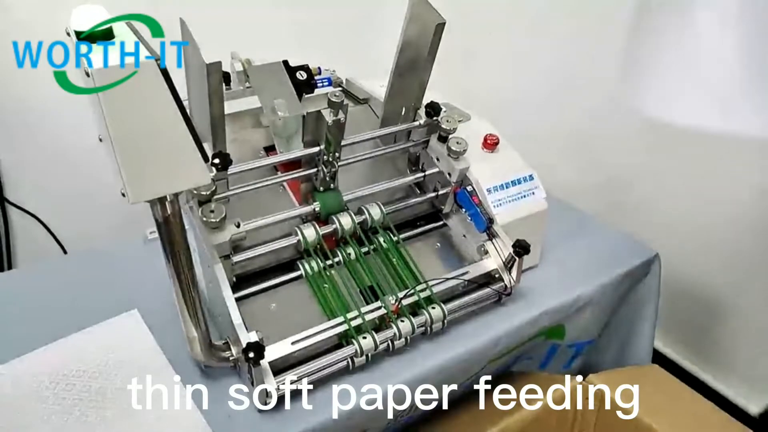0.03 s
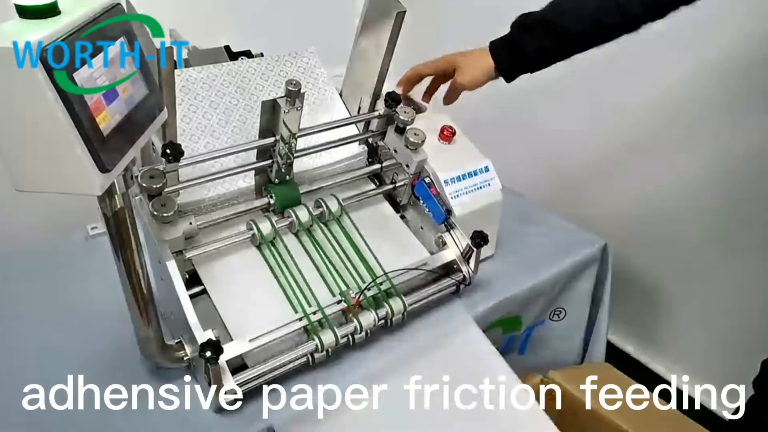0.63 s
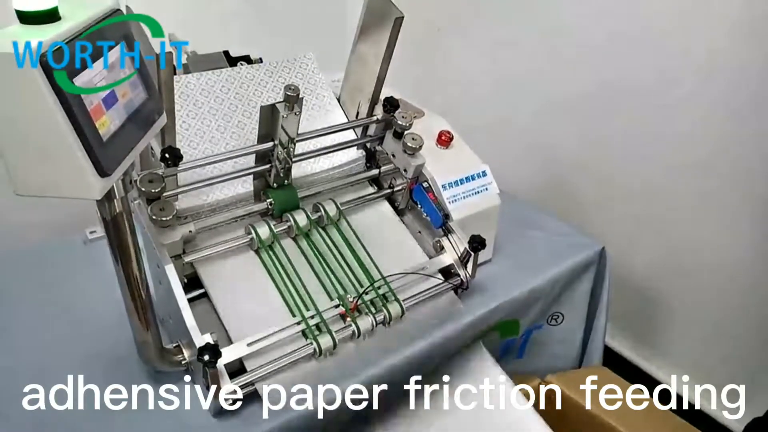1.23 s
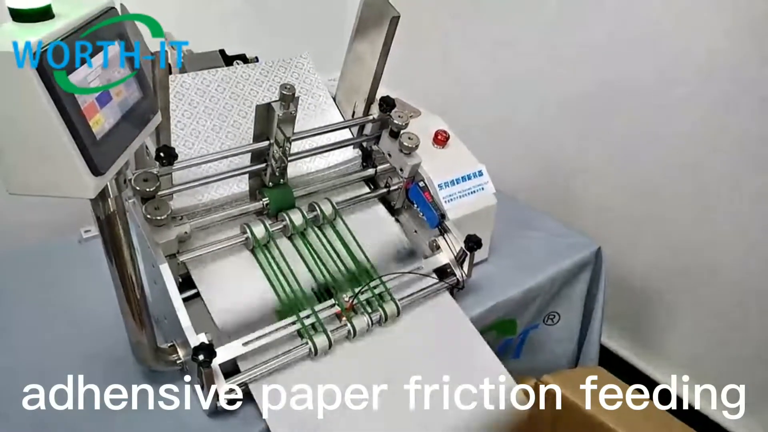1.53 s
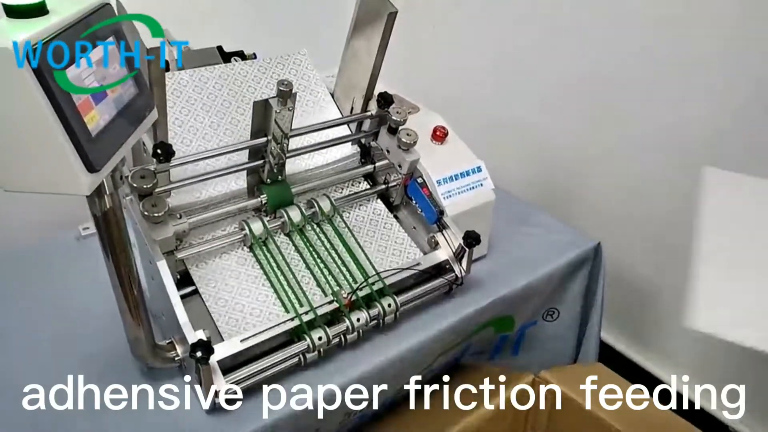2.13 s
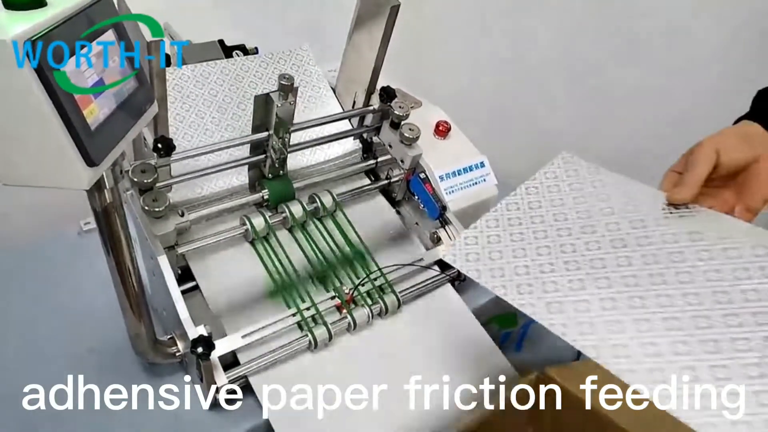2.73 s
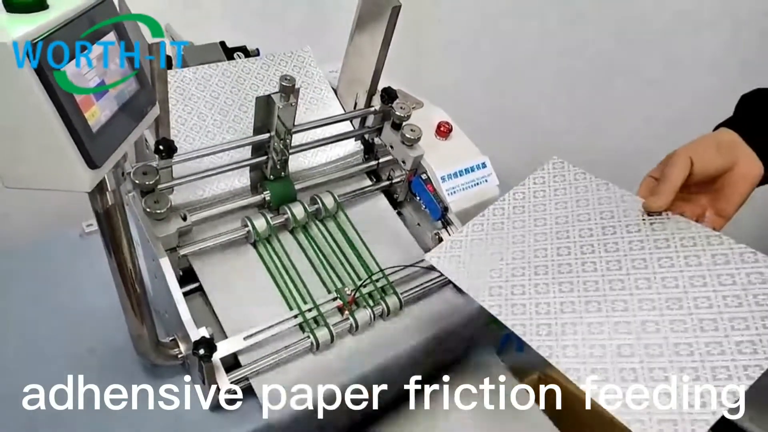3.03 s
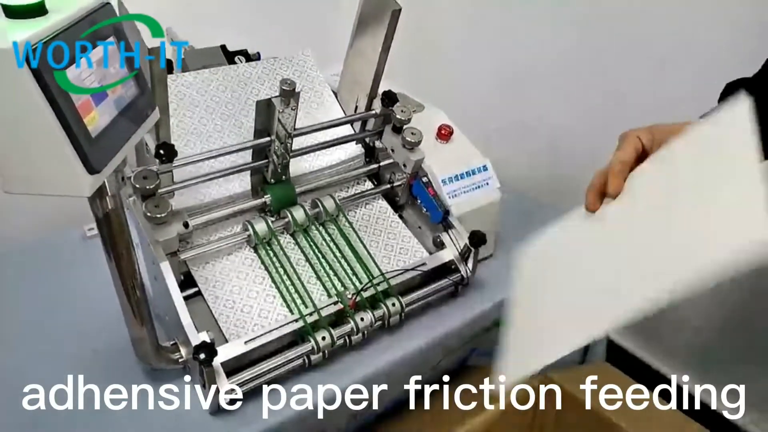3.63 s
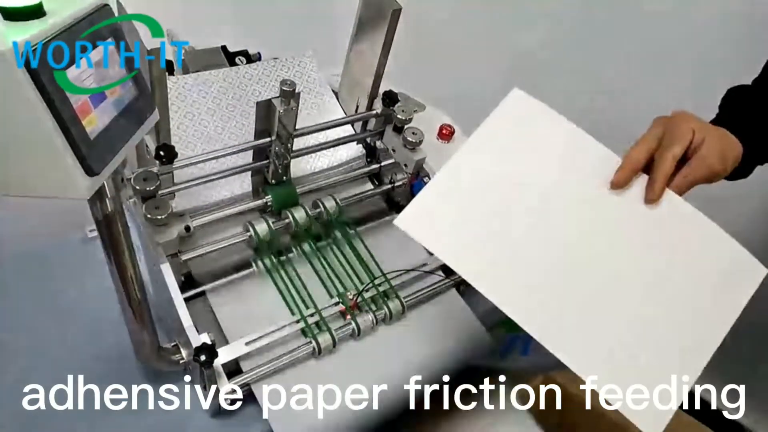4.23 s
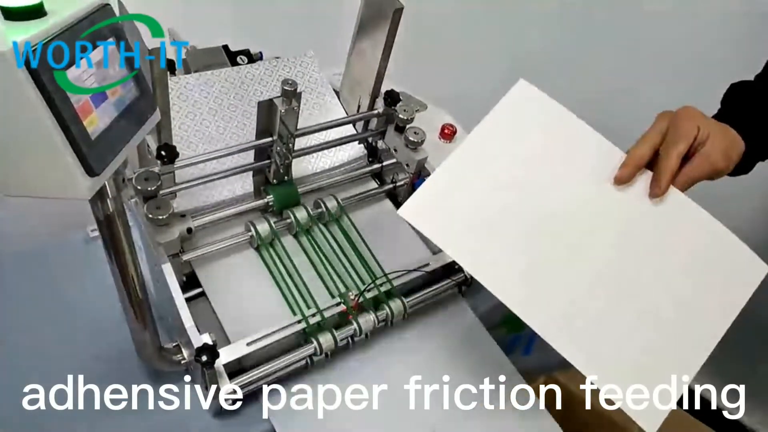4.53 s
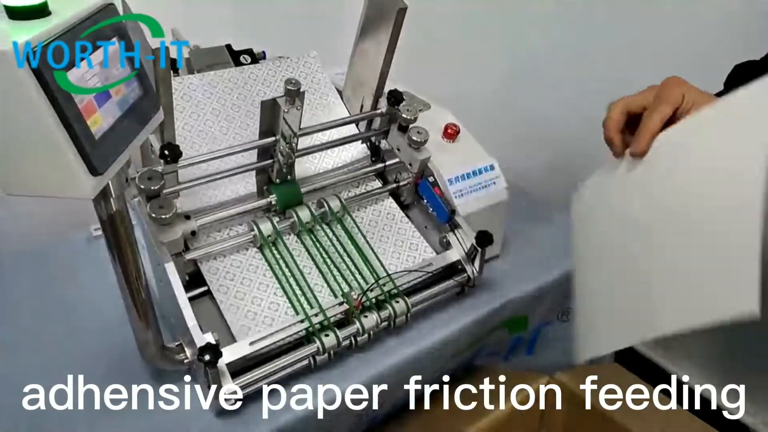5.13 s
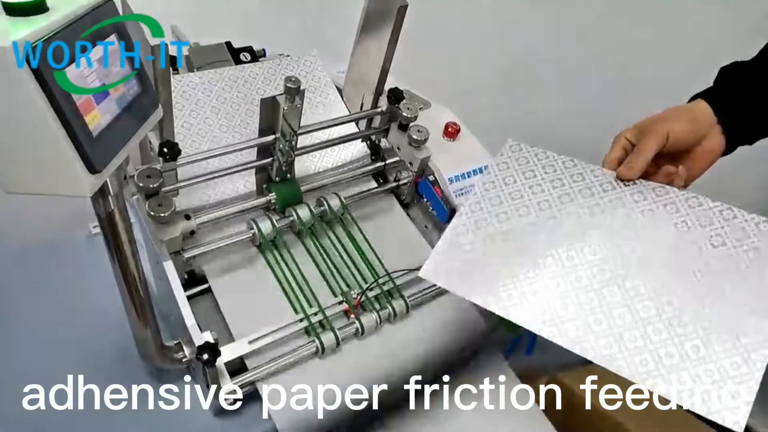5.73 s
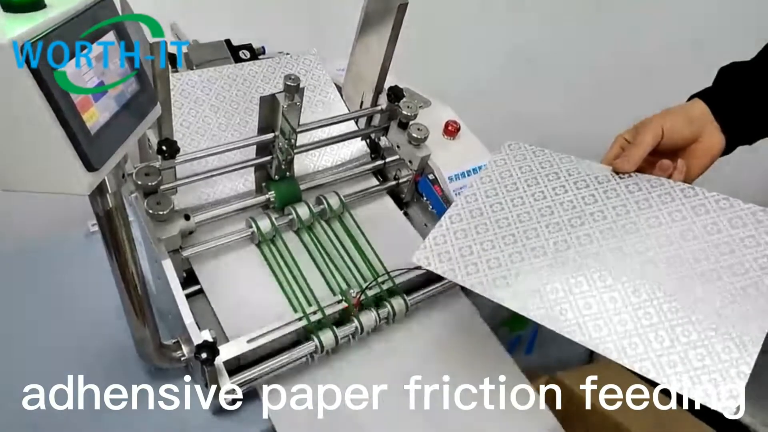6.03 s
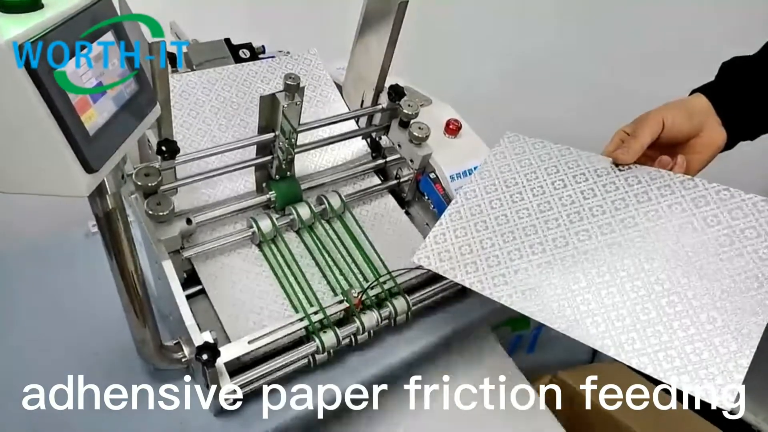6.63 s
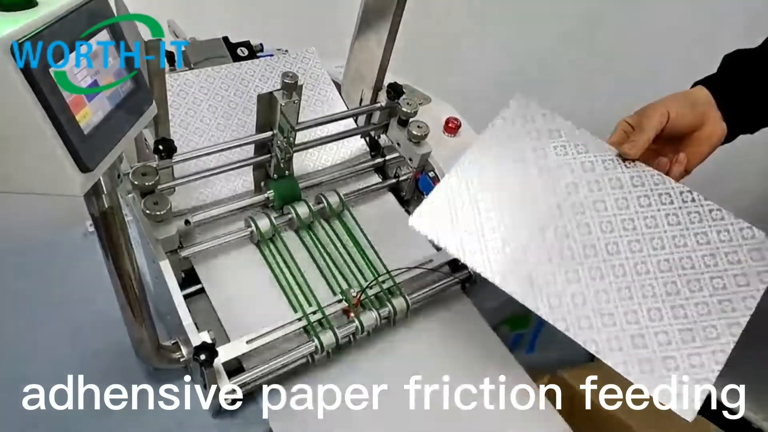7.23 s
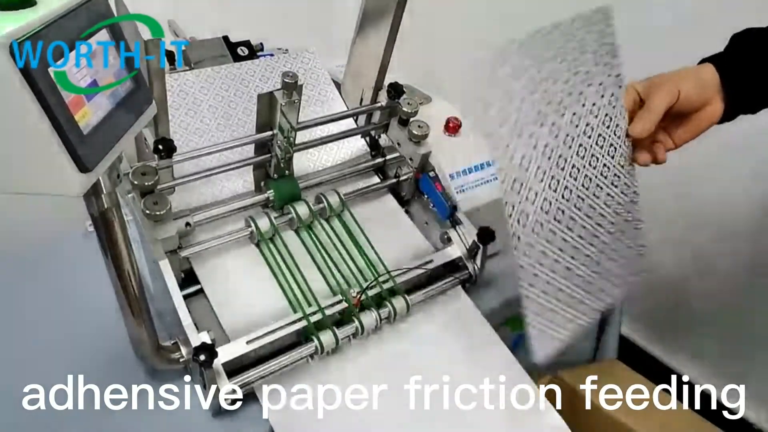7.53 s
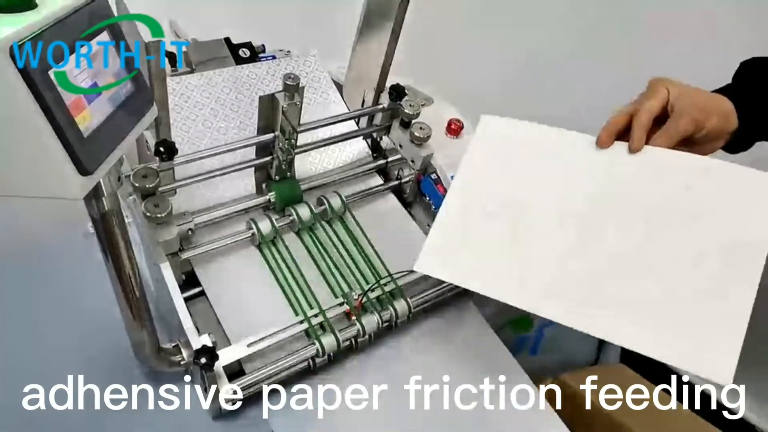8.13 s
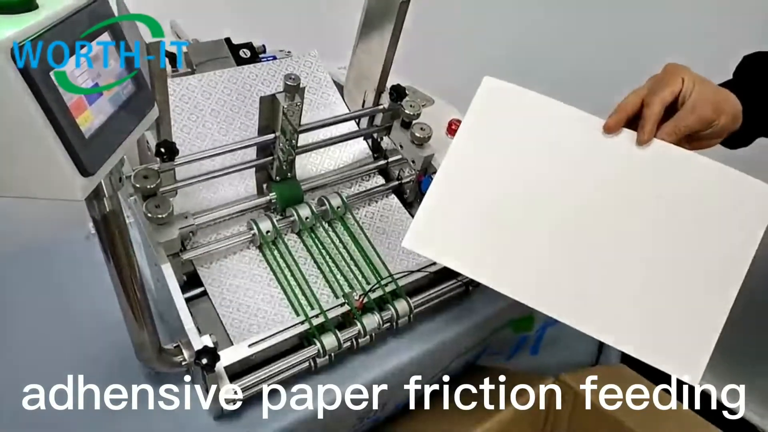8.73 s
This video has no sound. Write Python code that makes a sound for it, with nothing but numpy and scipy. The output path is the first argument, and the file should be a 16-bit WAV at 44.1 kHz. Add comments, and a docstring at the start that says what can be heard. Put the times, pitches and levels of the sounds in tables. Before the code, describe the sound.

Paper rustles faintly and the sound cuts out for an instant. Then a tabletop sheet feeder runs five times, about a second each, with half-second pauses. In every run the motor whirs with a thin whine, paper hisses over rubber belts, and the rollers rattle quickly, setting steel rods ringing. A clunk follows each stop. The machine sounds close, in a small, hard-walled workshop with a short reverberation.

```python
"""A tabletop friction feeder pushes five sheets through in a small hard-walled workshop.
First paper rustles and the sound drops out for a moment. Then the motor runs five times, once a sheet:
it starts with a jolt, sliding friction makes the paper hiss, and the drive whirs in the steel frame.
The rollers rattle once a turn, about nine times a second; hard impacts set rods and panels ringing.
A clunk follows the stop, and the reverberation dies away."""
import sys
import numpy as np
from scipy import signal
from scipy.fft import rfft, irfft, next_fast_len
from scipy.io import wavfile
from scipy.ndimage import map_coordinates

SR = 44100
rng = np.random.default_rng(int(sys.argv[2]) if len(sys.argv) > 2 else 0)


def waveform_to_disk(signal):
    """Save audio, clipped to [-1, 1], as 16-bit WAV at the path in sys.argv[1]."""
    frames = np.transpose(np.atleast_2d(signal))
    scaled = np.clip(frames, -1, 1) * 32767
    samples = np.round(scaled).astype(np.int16)
    wavfile.write(sys.argv[1], SR, samples)


N = 392049
TIME = np.arange(N) / SR


def amp(db):
    """Amplitude ratio of a level in decibels."""
    return 10 ** (np.asarray(db) / 20)


def unit(x):
    """Normalisation to rms 1."""
    return x / np.sqrt(np.mean(x ** 2) + 1e-20)


def along(points, hz):
    """Interpolation of (f/Hz, value) points on a logarithmic frequency axis."""
    f, v = np.transpose(points)
    return np.interp(np.log(hz + 1), np.log(f), v)


def wobble(rate):
    """Smooth random modulation through rate knots a second."""
    return map_coordinates(rng.standard_normal(int(N * rate / SR) + 4), [TIME * rate])


def pulse(s, half_s):
    """Gaussian envelope centred on time s."""
    return np.exp(-((TIME - s) / half_s) ** 2)


def decay(s, rise_s, t60):
    """Exponential decay from time s, with a linear onset."""
    return np.clip((TIME - s) / rise_s, 0, 1) * amp(-60 * np.abs(TIME - s) / t60)


def filtered(x, response):
    """Linear filtering: the spectrum of x times a frequency response."""
    n = x.shape[-1]
    m = next_fast_len(n + 8192)
    return irfft(rfft(x, m) * response(np.fft.rfftfreq(m, 1 / SR)), m)[..., :n]


def colour(x, spectrum):
    """Spectral shaping of x, at rms 1."""
    return unit(filtered(x, lambda hz: amp(along(spectrum, hz))))


def grains(rate):
    """Shot noise: tiny contacts of random size at random times, rate a second."""
    sizes = rng.standard_normal(N) * amp(2 * rng.standard_normal(N))
    return unit(sizes * (rng.random(N) < rate / SR))


def wavering(hz, width):
    """Narrow-band noise: a tone about width Hz wide whose amplitude and phase drift."""
    phase = 2 * np.pi * np.cumsum(hz * np.ones(N)) / SR
    return unit(wobble(width) * np.cos(phase) + wobble(width) * np.sin(phase))


# spectrum of the room's air: f/Hz, relative density/dB
AIR_SPECTRUM = [(20, -6), (45, -5), (80, -16.5), (150, -19), (270, -7.5), (700, -2), (1350, -16),
                (2950, -15), (3900, -27.5), (6800, -19.5), (7900, -27), (9000, -47.5)]
def background(whistle_hz=8005):
    """Noise floor: broadband air and a faint narrow-band whistle from the motor electronics."""
    air = amp(-61 + 0.96 * wobble(2.36)) * colour(rng.standard_normal(N), AIR_SPECTRUM)
    return air + amp(-83) * wavering(whistle_hz, width=27)


# reverberation time: f/Hz, T60/s
REVERB_TIMES = [(100, 1), (300, 0.88), (900, 0.79), (2500, 0.62), (7000, 0.69), (11000, 0.14)]
# the walls return less of the low notes: f/Hz, gain/dB
WALL_GAIN = [(150, -1), (270, -3), (380, -2.5), (550, 0)]
def workshop(x, delay_s=0.009, segments=24):
    """Diffuse reverberation: the walls answer after a delay, in a pattern that shifts as things move."""
    out = np.zeros(N + 2 * SR)
    for part in np.array_split(np.arange(N), segments):
        hz, t, noise = signal.stft(rng.standard_normal(SR), SR, nperseg=256)
        absorption = amp(-60 * t / along(REVERB_TIMES, hz)[:, None])
        tail = signal.istft(noise * absorption, SR, nperseg=256)[1]
        echo = signal.fftconvolve(x[part], tail / np.linalg.norm(tail))
        out[part[0] + round(delay_s * SR):][:len(echo)] += echo
    return filtered(out[:N], lambda hz: amp(along(WALL_GAIN, hz)))


# dull bumps: t/s, level/dB, T60/s
LOW_BUMPS = [(.56, -56, 0.13), (4.247, -44.5, 0.4), (6.9, -48, 0.55), (7.513, -45, 0.68)]
# their spectrum: f/Hz, relative density/dB
BUMP_SPECTRUM = [(20, -6), (45, -35), (80, 30), (125, -11), (200, -34), (400, -62)]
def bumps(rise_s=0.015):
    """Exponentially decaying low noise: an occasional dull bump under the clatter."""
    envelope = sum(amp(db) * decay(s, rise_s, t60) for s, db, t60 in LOW_BUMPS)
    return envelope * colour(rng.standard_normal(N), BUMP_SPECTRUM)


# paper handled while the motor rests: t/s, peak level/dB, half length/s
PAPER_RUSTLES = [(0.067, -57, 0.17), (0.153, -51, 0.021), (0.2, -66, 0.029), (3.707, -56, 0.1),
                 (7.042, -57, 0.03)]
# spectra of rubbing paper and of a swung sheet: f/Hz, relative density/dB
PAPER_SPECTRUM = [(300, -34), (900, -10.5), (1800, -9.5), (2500, 0), (3300, 0.5), (3800, -6.5), (4500, -6),
                  (5200, 0), (6100, 1), (7300, 3), (8000, -5.5), (9000, -14.5), (10200, -20),
                  (11000, -71.5)]
FLUTTER_SPECTRUM = [(12, -45), (20, 2), (90, -16.5), (168, -2.5), (219, -11), (310, -6), (390, -17),
                    (556, -10), (650, -24), (1030, -18.5), (4000, -54), (5200, -41), (8800, -120)]
def handling():
    """Flutter and friction: a sheet swung through the air flaps low, and loose paper rustles."""
    swish = sum(amp(db) * pulse(s, half_s) for s, db, half_s in PAPER_RUSTLES)
    rustle = swish * colour(grains(rate=5300), PAPER_SPECTRUM)
    swing = amp(-47.5) * np.interp(TIME, [0, .13, .24, .6, .68], [0.93, 0.74, 0.36, 0.31, 0])
    return rustle + swing * colour(rng.standard_normal(N), FLUTTER_SPECTRUM)


# hollow notes after some knocks: t/s, f/Hz, level/dB, T60/s, bandwidth/Hz
HOLLOW_MODES = [(0.95, 710, -38.5, 0.9, 70), (0.95, 329, -35.5, 0.49, 58), (1.19, 622, -44, 1.2, 79),
                (1.52, 268.6, -44, 0.9, 23), (1.99, 267.4, -47, 0.61, 24), (2.835, 596, -36, 0.25, 130),
                (4.247, 590, -50, 1, 78), (4.603, 611, -39.5, 0.33, 63), (5.68, 385, -44, 1, 92),
                (6.016, 614, -42.5, 0.71, 45), (7.514, 594, -45, 1.9, 40), (8.085, 247.7, -39.5, 0.8, 19.8),
                (8.2, 238, -39, 0.51, 19.3)]
def hollows(rise_s=0.0045):
    """Damped free vibration: a stretched sheet or a panel hums on."""
    return sum(amp(db) * decay(s, rise_s, t60) * wavering(hz, width)
               for s, hz, db, t60, width in HOLLOW_MODES)


# the many close modes of the steel rods and guides: f/Hz, relative density/dB
ROD_SPECTRUM = [(180, -37), (260, -12), (430, -0.5), (570, 1.5), (1050, 4.5), (1300, -9.5), (1650, -6.5),
                (2070, -2.5), (2650, -13), (3050, -11.5), (3800, -65)]
def rods(ring_db=-39, hard_db=-30, steepness=2.73, t60=1.56, spread_s=0.056):
    """High modal density: steelwork rings as a wash of noise after hard blows, hardly after soft ones."""
    power = np.zeros(N)
    for s, _, frame_db, *_ in KNOCKS:
        start = round(s * SR)
        t = TIME[:N - start]
        level_db = ring_db + steepness * (frame_db - hard_db) - 60 * t / t60
        power[start:] += (1 - np.exp(-t / spread_s)) * amp(level_db) ** 2
    return np.sqrt(power) * colour(rng.standard_normal(N), ROD_SPECTRUM)


def squeak(s=0.669, hz=2770, db=-43.5, half_s=0.018):
    """Stick-slip friction: a rubber belt slips for an instant as it grips the first sheet."""
    return amp(db) * pulse(s, half_s) * wavering(hz, width=150)


# a sheet's edge snaps free: t/s, peak level/dB
EDGE_SNAPS = [(0.598, -45.5), (1.041, -35.5), (4.024, -55), (5.29, -41.5), (6.465, -49), (7.294, -48),
              (8.54, -42.5)]
# spectrum of a snap: f/Hz, relative density/dB
SNAP_SPECTRUM = [(800, -19), (2700, 1), (4200, -16), (6000, 11), (7400, 10.5), (8600, 0), (10000, -36)]
def snaps(t60=0.074):
    """Sudden release: an edge flicks past a guide with a short bright transient."""
    envelope = sum((TIME >= s) * amp(db - 60 * np.abs(TIME - s) / t60) for s, db in EDGE_SNAPS)
    return envelope * colour(rng.standard_normal(N), SNAP_SPECTRUM)


def scraping(edges_hz=(3900, 6500, 8700), depths_db=(2, 2.2, 2.2, 4.5)):
    """Sliding friction of paper on rubber: each band catches and slips on its own, the highest most."""
    rub = colour(grains(rate=11000) + amp(-5.5) * grains(rate=450), PAPER_SPECTRUM)  # grit and crackle
    bands = [filtered(rub, lambda hz: np.digitize(hz, edges_hz) == k) for k in range(len(depths_db))]
    return unit(sum(band * amp(depth * wobble(45)) for band, depth in zip(bands, depths_db)))


# resonances of the frame and its panels: f/Hz, bandwidth/Hz, relative level/dB
FRAME_MODES = [(121, 13, -6.5), (164, 4, -2.5), (226, 16, -0.5), (270, 31.5, 4), (355.5, 7.4, 3),
               (453, 23, -23), (588, 180, -2.5), (733, 50, -9.5), (743, 28, -6), (948, 24, -7),
               (1101, 38, -2.5), (1357, 26, -4), (1520, 23, -10), (1516, 40, -17), (1710, 38, -7),
               (2554, 210, -2.5), (2990, 220, -23)]
def frame_response(spectrum, floor_db, size=8192):
    """Resonance: the frame's modes rise out of a broad spectrum, as a minimum-phase impulse response."""
    hz = np.fft.rfftfreq(size, 1 / SR)
    peaks = sum(amp(db) ** 2 / (1 + (2 * (hz - centre) / width) ** 2)
                for centre, width, db in FRAME_MODES)
    gain = amp(along(spectrum, hz)) * np.sqrt(peaks + amp(floor_db) ** 2)
    cepstrum = irfft(np.log(gain + 1e-6))
    causal_fold = np.r_[1, np.full(size // 2 - 1, 2), np.zeros(size // 2)]
    return irfft(np.exp(rfft(cepstrum * causal_fold)))[:size // 2]


# motor runs, levels relative: start t/s, stop t/s, hiss level/dB, rumble level/dB, jolt level/dB,
# time to grip/s, fall of the hiss over the run/dB, whine level/dB
MOTOR_RUNS = [(0.603, 1.877, -42.5, -41, -79, 0.065, 8, -54),
              (2.368, 3.514, -47, -47.5, -56, 0.051, 5, -56),
              (4.022, 5.168, -49, -46.5, -66, 0.019, 0.5, -53.5),
              (5.673, 6.792, -46.5, -49.5, -48, 0.0066, 2, -50.5),
              (7.295, 8.421, -45.5, -43, -54, 0.041, 0, -53.5)]
# lesser tones of the drive: f/Hz, relative level/dB, bandwidth/Hz
GEAR_TONES = [(243.6, -55, 44), (359, -57.5, 20), (462.4, -59, 30), (594, -59, 55), (1100, -58.5, 130),
              (5970, -58.5, 240)]
# the belts' force on the frame: f/Hz, relative density/dB
BELT_SPECTRUM = [(40, -14), (90, 0.5), (170, -9), (250, -1.5), (400, -3.5), (650, 3), (1100, 0.5),
                 (1450, -5), (2000, -5.5), (3000, -13), (4000, -10), (9000, -87.5)]
def drive(turn_s=0.114, spin_up_s=0.12, stop_s=0.12, overrun_s=0.029, whine_hz=2502, whine_sag=0.012):
    """Friction and forced vibration: paper rubs, belts shake the frame, gears whir, the motor whines."""
    hiss, rumble, gears, whine, drag = np.zeros((5, N))
    for start, stop, hiss_db, rumble_db, _, grip_s, fall_db, whine_db in MOTOR_RUNS:
        braking = np.clip((stop + overrun_s - TIME) / stop_s + .5, 0, 1)
        grip, speed = (np.clip((TIME - start) / rise, 0, 1) * braking for rise in (grip_s, spin_up_s))
        travel = np.clip((TIME - start) / (stop - start), 0, 1)
        hiss += grip * amp(hiss_db - fall_db * travel)
        rumble += grip * amp(rumble_db)
        gears += speed
        whine += speed * amp(whine_db)
        # the rollers press harder on the sheet once a turn
        turns = np.linspace(start, stop, round((stop - start) / turn_s) + 1)[1:]
        drag += sum(pulse(s, half_s=0.029) for s in turns)
    paper = hiss * amp(-1.17 + 2 * drag + 0.97 * wobble(70)) * scraping()
    shake = signal.fftconvolve(grains(rate=1400), frame_response(BELT_SPECTRUM, floor_db=-10))[:N]
    belts = rumble * amp(-6 + 4.5 * drag + 1.94 * wobble(35)) * unit(shake)
    # uneven load makes every tone waver, and pulls the whine down once a turn
    whir = gears * amp(-1) * sum(wavering(hz, width) * amp(db) for hz, db, width in GEAR_TONES)
    whine *= amp(-5 + 3 * wobble(7.8))
    pitch_hz = whine_hz * (1 - whine_sag * drag) + 18 * wobble(29)
    return paper + belts + whir + whine * wavering(pitch_hz, width=115)


def jolts(rise_s=0.0034, notes_hz=(241, 470)):
    """Starting transient: the frame shudders at each motor start; rows as in KNOCKS."""
    return [(start, db, db, db - 6.5, db - 7, rise_s, *notes_hz) for start, _, _, _, db, *_ in MOTOR_RUNS]


# knocks, levels relative: the rollers' knocks, the clunk after each stop and a start jolt at 5.68 s: t/s, thud
# level/dB, frame level/dB, clack level/dB, paper tick level/dB, rise time/s (short: a clean blow, long: a
# rattle), low panel note f/Hz, high panel note f/Hz
KNOCKS = [(0.946, -33.5, -30.5, -35, -43.5, 0.00055, 300, 803),
          (1.095, -43, -44, -46, -51, 0.0049, 270, 620),
          (1.189, -31, -34, -39, -39.5, 0.0015, 345, 538),
          (1.3, -34, -32, -35, -59, 0.00013, 204, 590),
          (1.41, -38, -33, -37.5, -57, 0.000044, 230, 590),
          (1.515, -38.5, -45, -45, -65, 0.0025, 260, 590),
          (1.635, -35, -44, -45, -55, 0.0043, 265, 465),
          (1.742, -41, -43, -43.5, -46, 0.0028, 330, 590),
          (1.867, -36, -44, -43, -48.5, 0.0051, 280, 538),
          (1.985, -31, -32.5, -43, -44.5, 0.0028, 264, 564),
          (2.601, -37.5, -36.5, -44.5, -48, 0.0019, 300, 460),
          (2.718, -37, -41, -47, -49, 0.013, 273, 1080),
          (2.835, -36.5, -38.5, -47, -47, 0.00077, 460, 556),
          (2.9525, -38.5, -32.5, -36.5, -48.5, 0.00016, 370, 562),
          (3.072, -35, -40.5, -50, -52.5, 0.0003, 280, 1100.0),
          (3.178, -44, -45, -44, -52, 0.011, 270, 475),
          (3.278, -37, -41.5, -51, -50, 0.00042, 284, 587),
          (3.402, -39.5, -38, -43, -53, 0.00054, 360, 830),
          (3.522, -36, -40, -45, -51, 0.00035, 270, 528),
          (3.633, -41.5, -47, -43, -46.5, 0.0015, 258, 980),
          (4.245, -42, -35, -43, -49, 0.00072, 400, 580),
          (4.373, -39, -42.5, -45, -56, 0.015, 250, 1100.0),
          (4.493, -41, -42, -45, -46.5, 0.00041, 330, 563),
          (4.603, -35, -37.5, -45.5, -45, 0.00067, 500, 566),
          (4.715, -36.5, -32, -40, -57, 0.00049, 350, 1000),
          (4.829, -38.5, -41.5, -44, -52, 0.003, 240, 575),
          (4.946, -33, -35.5, -45.5, -47, 0.00079, 237, 430),
          (5.057, -36.5, -38.5, -42.5, -51, 0.0026, 260, 467),
          (5.172, -33, -37, -47, -51.5, 0.0018, 280, 450),
          (5.2872, -37, -30, -36.5, -43, 0.00053, 266, 596),
          (5.68, -50.5, -45.5, -52, -64, 0.0012, 340, 537),
          (6.0154, -36.5, -38, -46.5, -45, 0.00017, 410, 560),
          (6.123, -42, -43, -49, -59, 0.0065, 270, 570),
          (6.245, -38, -62, -47, -56, 0.00078, 240, 557),
          (6.344, -43, -47, -49.5, -52, 0.0027, 230, 470.0),
          (6.4658, -46, -52.5, -49, -45.5, 0.00031, 320, 557),
          (6.568, -42, -53, -51, -47.5, 0.0011, 310, 510),
          (6.677, -36, -37.5, -47, -49.5, 0.00051, 280, 775),
          (6.793, -39.5, -40.5, -50.5, -50, 0.0025, 240, 627),
          (6.903, -42, -43, -45, -51.5, 0.0017, 280, 594),
          (7.5135, -42.5, -34.5, -41, -56, 0.00023, 350, 600),
          (7.632, -43.5, -40.5, -45, -61, 0.013, 230.0, 646),
          (7.742, -48, -37.5, -42.5, -45.5, 0.0093, 290, 587),
          (7.854, -38, -40, -41.5, -45.5, 0.0073, 355, 600),
          (7.976, -33, -41, -42.5, -49, 0.002, 186, 538),
          (8.083, -40.5, -38, -43, -47.5, 0.0013, 250, 800),
          (8.195, -36.5, -42, -46, -53, 0.0041, 270, 620),
          (8.312, -37.5, -34.5, -41.5, -48.5, 0.00023, 280, 579),
          (8.426, -36.5, -40, -44, -49, 0.0039, 205, 550),
          (8.542, -33.5, -40, -42, -52.5, 0.00056, 250, 763)]
# spectra of the rattle and of the first hard contact: f/Hz, relative density/dB
RATTLE_SPECTRUM = [(35, -29.5), (80, -6), (130, -3), (260, 3), (600, -1), (1050, -1.5), (1400, -6.5),
                   (1950, -5), (2500, -6), (3100, -3), (3900, -16.5), (5200, -18), (7100, -17),
                   (8300, -25.5), (10000, -57)]
STRIKE_SPECTRUM = [(60, -18), (250, -3.5), (370, -0.5), (480, 6), (660, -2.5), (1100, 4), (1550, 2),
                   (2050, -5.5), (2600, -2), (3100, -3.5), (3700, -26), (5800, -15), (7300, -15),
                   (10000, -47.5)]
def knocks(hold_s=0.011, rattle_t60=0.11, note_t60=0.08, hard_rise_s=0.00034, rebound_s=0.0121):
    """Impact excitation: a blow, a rebound and a rattle of loose parts ring the frame and two notes."""
    lead = 256  # samples before the contact
    t = np.maximum(np.arange(-lead, SR // 4), 0) / SR
    body = frame_response(RATTLE_SPECTRUM, floor_db=-6)
    blow = frame_response(STRIKE_SPECTRUM, floor_db=-3)
    # table boom, thud, frame, clack, paper tick
    bands_hz = [(70, 165), (165, 430), (430, 1250), (1250, 3700), (4500, 10000)]
    below = lambda hz, edge: 1 / (1 + (hz / edge) ** 8)
    rebound = 1 + 0.6 * np.exp(-((t - rebound_s) / 0.001) ** 2)
    out = np.zeros(N + SR)
    for s, thud_db, frame_db, clack_db, tick_db, rise, *notes_hz in list(KNOCKS) + jolts():
        attack = 1 - np.exp(-t / rise)
        fading = lambda t60, hold=0: attack * amp(-60 * np.maximum(t - rise - hold, 0) / t60)
        force = rng.standard_normal(len(t)) * fading(rattle_t60, hold_s) * rebound
        ring = signal.fftconvolve(force, body / np.linalg.norm(body))[:len(t)]
        hardness = 1 / (1 + rise / hard_rise_s)  # a sudden contact puts more into the first blow
        ring[lead:lead + len(blow)] -= 32 * hardness * blow / np.linalg.norm(blow)
        bands = [filtered(ring, lambda hz: below(hz, high) - below(hz, low)) for low, high in bands_hz]
        bands_db = [min(thud_db - 11.5, -47), thud_db - 2, frame_db - 1.95, clack_db - 2.47, tick_db]
        notes = [-fading(note_t60) * np.sin(2 * np.pi * hz * t) for hz in notes_hz]
        notes_db = [thud_db - 6, frame_db - 8]
        for part, db in zip(bands + notes, bands_db + notes_db):
            rms = np.sqrt(np.sum(part ** 2) / (0.04 * SR))  # its energy spread over 40 ms
            out[round(s * SR) - lead:][:len(t)] += amp(db) * part / rms
    return out[:N]


def scene():
    """Superposition of the machine's direct sound, its reverberation and the background."""
    hits = amp(-0.63) * knocks() + snaps()
    motor = drive() + squeak()
    room = workshop(amp(-8) * hits + amp(-11) * motor)
    return (background() + room + rods() + hollows() + bumps() + handling() + motor + hits)[None]


def record(dry, silence_s=(0.237, 0.466), top_hz=11200):
    """Gating and band limiting: the sound drops out briefly near the start and loses its top treble."""
    live = (TIME < silence_s[0]) | (TIME > silence_s[1])
    return filtered(dry * live, lambda hz: 1 / np.sqrt(1 + (hz / top_hz) ** 60))


dry = scene()
out = record(dry)
waveform_to_disk(out)
```